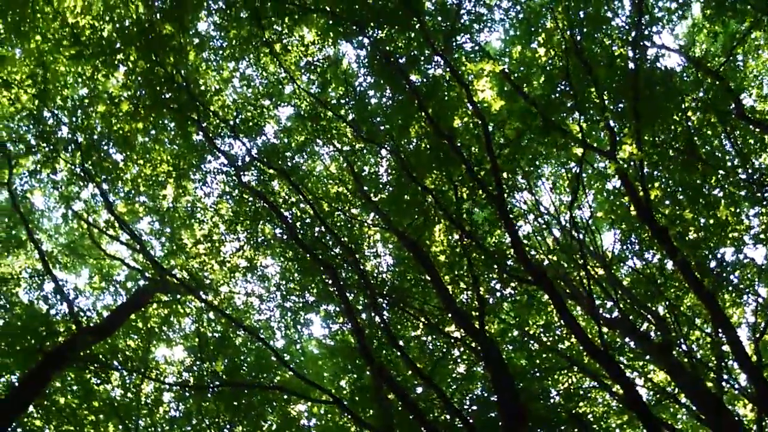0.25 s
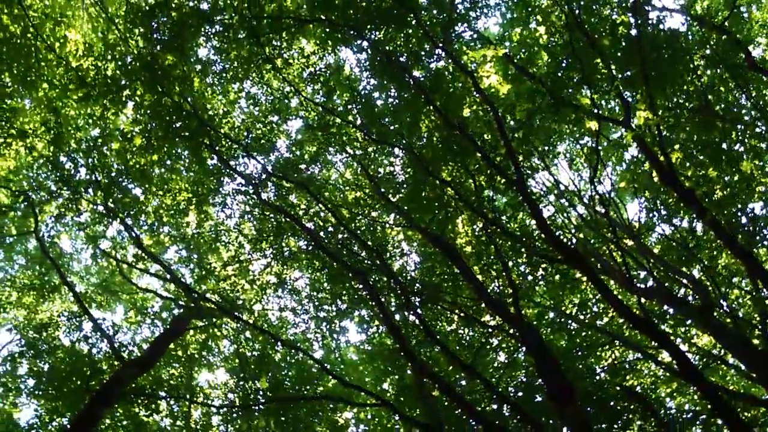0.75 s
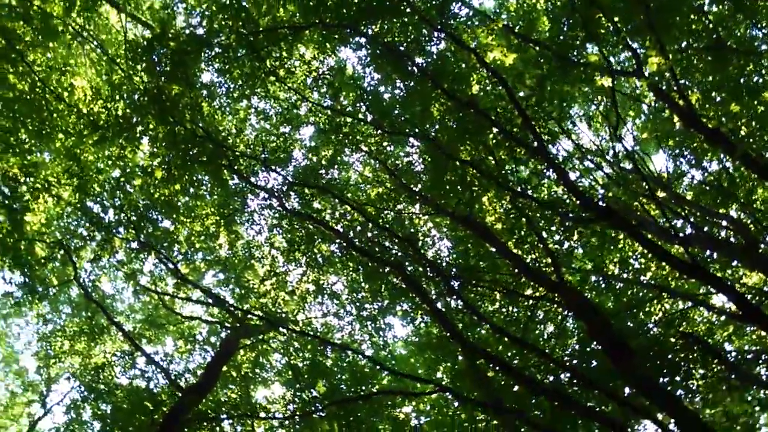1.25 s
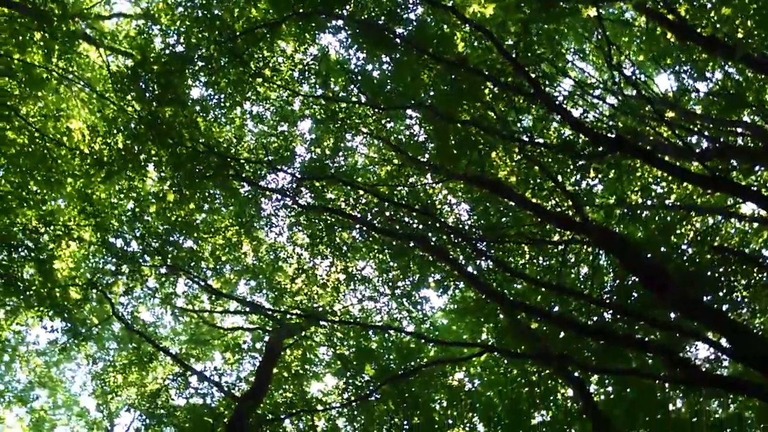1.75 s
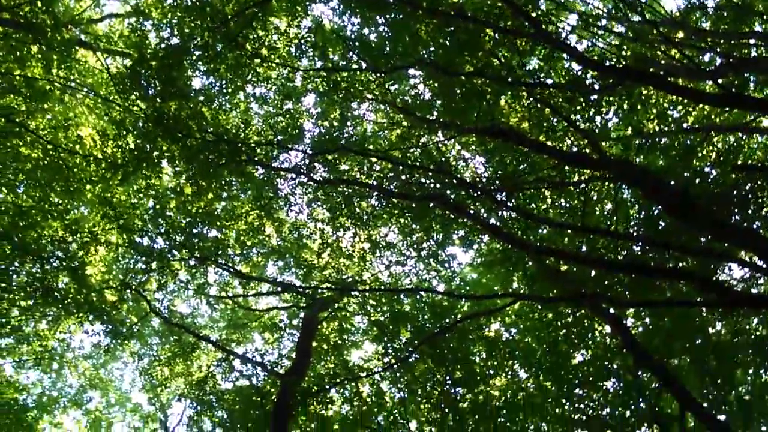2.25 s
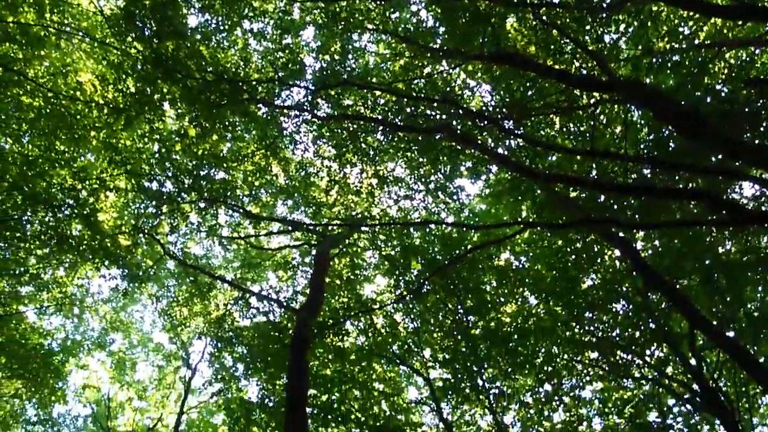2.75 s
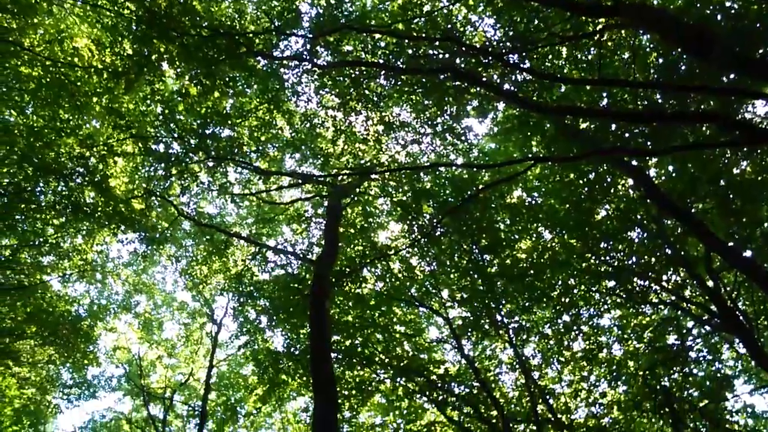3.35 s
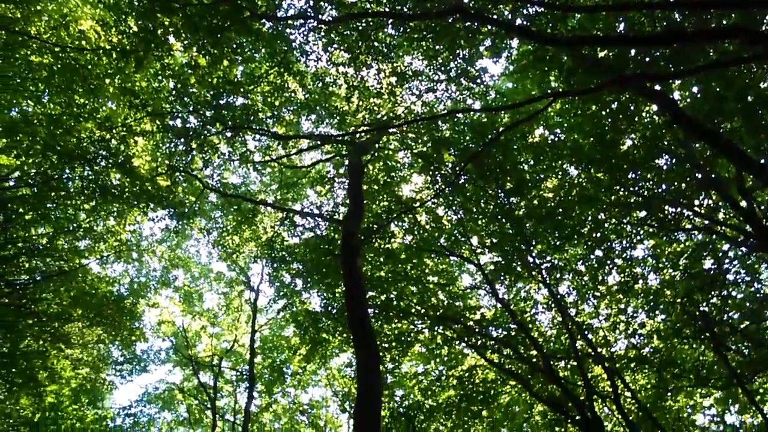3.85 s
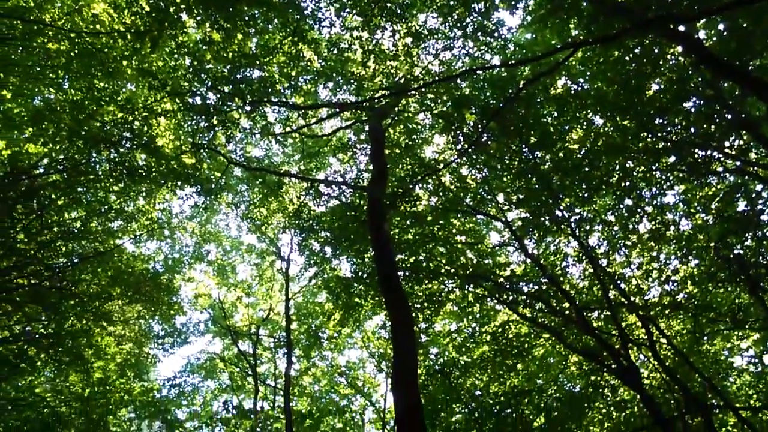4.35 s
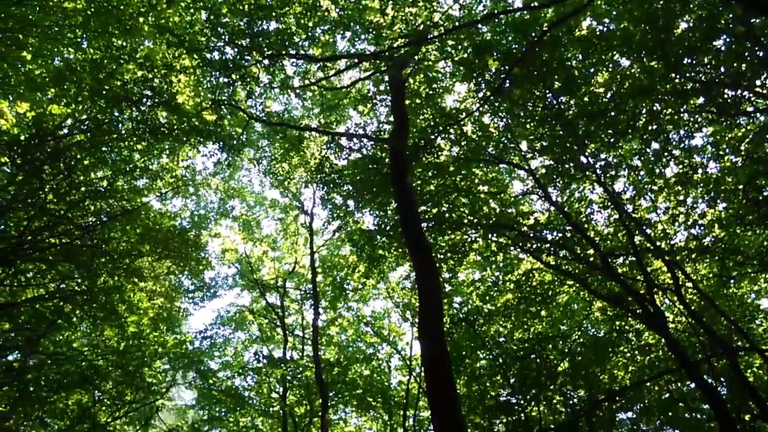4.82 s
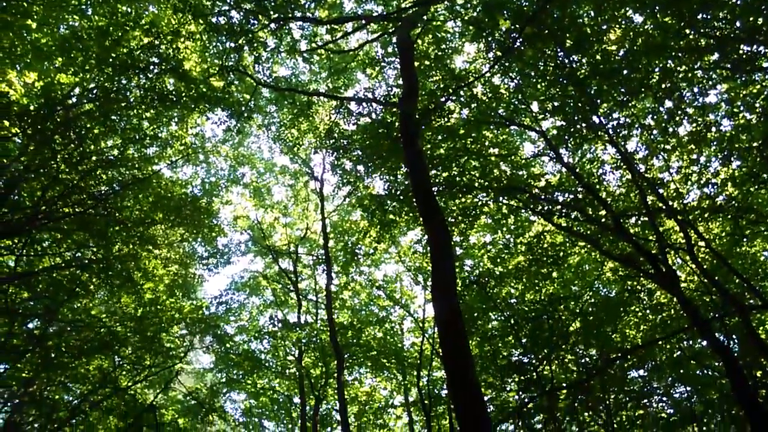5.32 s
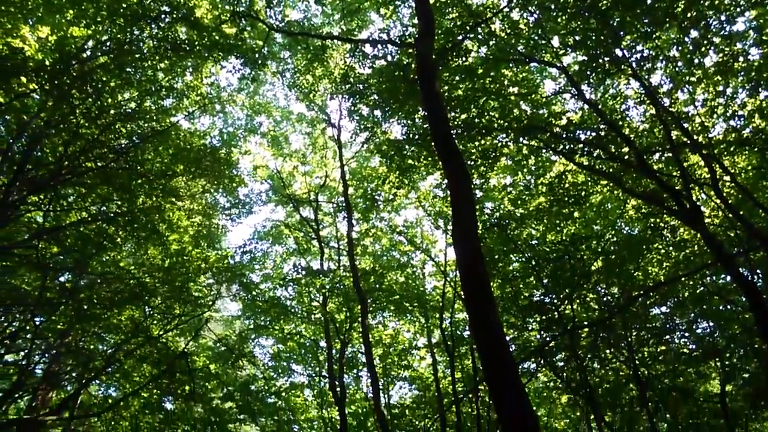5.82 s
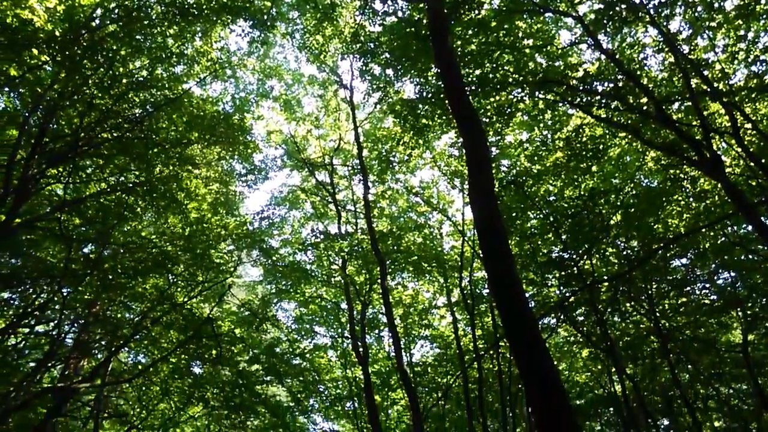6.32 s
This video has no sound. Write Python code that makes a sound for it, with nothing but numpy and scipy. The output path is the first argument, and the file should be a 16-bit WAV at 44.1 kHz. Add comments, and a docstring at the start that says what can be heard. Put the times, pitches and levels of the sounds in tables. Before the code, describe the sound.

A warbler sings sliding, clear whistles with rasps in a leafy, echoing wood, while breeze and fingers thump and rumble on the microphone.

```python
"""Warbler in a leafy wood

A warbler sings sliding whistles with rasps and a chack; thinner calls and a twitter sound farther off.
The voices are gliding sines with faint partials, the rasps bands of noise; scatter from trunks and
leaves gives them a long tail. Leaves and far air are flickering noise. A breeze buffets two microphone
ports, the left one harder, as trains of eddy pulses; fingers on the housing ring its damped modes."""
import sys
import numpy as np
from scipy import signal
from scipy.fft import rfft, irfft
from scipy.io import wavfile
from scipy.ndimage import uniform_filter1d

SR = 44100
rng = np.random.default_rng(int(sys.argv[2]) if len(sys.argv) > 2 else 0)


def wav_out(sig):
    """Save sig, one row per channel (or a flat mono array), as 16-bit PCM at SR to the path in sys.argv[1]."""
    wavfile.write(sys.argv[1], SR, np.round(np.clip(np.atleast_2d(sig).T, -1, 1) * 32767).astype(np.int16))


N = 290178


def from_db(db):
    """The decibel law: amplitude gain of a level in dB."""
    return 10 ** (np.asarray(db) / 20)


def rms_one(x):
    """Normalisation by energy: scales each channel to rms 1."""
    return x / np.sqrt(np.mean(x ** 2, axis=-1, keepdims=True) + 1e-20)


def in_time(rows):
    """Linear interpolation: each column of a curve, sample by sample."""
    s, *columns = np.transpose(rows)
    return [np.interp(np.arange(N) / SR, s, column) for column in columns]


def at_hz(points, hz):
    """Interpolation on the logarithmic frequency axis: reads a spectrum at hz."""
    point_hz, values = np.array(points).T[:2]
    return np.interp(np.log(hz), np.log(point_hz), values)


def band(x, low_hz, high_hz, order=2):
    """Band-pass filtering: keeps what lies between two frequencies."""
    edges = [low_hz, min(high_hz, SR / 2.1)]
    return signal.sosfilt(signal.butter(order, edges, "band", fs=SR, output="sos"), x)


def drift(rate_hz):
    """Low-passed noise: a slow random course with rms 1."""
    step = 40   # samples between computed points
    pole = np.exp(-2 * np.pi * rate_hz * step / SR)
    noise = rng.standard_normal(N // step + 2002)
    slow = signal.lfilter([1], [1, -2 * pole, pole ** 2], noise)[2000:]   # without the settling
    return np.interp(np.arange(N) / step, np.arange(len(slow)), rms_one(slow))


def add(out, sound, s, pan_db):
    """Superposition: adds a sound at s seconds with a level difference, left over right."""
    i = max(round(s * SR), 0)
    out[:, i:i + len(sound)] += sound[:N - i] * from_db([[pan_db / 2], [-pan_db / 2]])


def leaves(patchy_db):
    """Broadband noise of leaves and far air: half-octave bands, each flickering a little."""
    # Each row: frequency in Hz, relative spectral density in dB per Hz.
    density = [(120, -18), (200, -3), (283, -0.5), (556, -4), (801, -5), (1050, -10.5), (1690, -11.5),
               (2480, -15), (3780, -14), (4620, -16.5), (13100, -14), (14800, -20), (15800, -27.5)]
    # Each row: time in seconds, level of the whole in dB.
    course = [(0, -52), (.45, -52), (.9, -53), (1.08, -56.5), (1.2, -54), (1.85, -57), (1.97, -55),
              (2.4, -56), (2.72, -58), (2.85, -54.5), (3.2, -54.5), (4.2, -53.5), (5.3, -57), (5.95, -57),
              (6.06, -56.5), (6.29, -56.5), (6.36, -50.5), (6.58, -55.5)]
    # Each row: frequency in Hz, left-right correlation.
    likeness = [(200, 0.36), (700, 0.23), (1400, 0.0847), (15000, 0.043)]
    out = 0
    together = drift(7.5)
    edges = 110 * 2 ** np.arange(0, 7.6, .5)
    white = rng.standard_normal((2, 2, N))
    for k, (low, high) in enumerate(zip(edges, edges[1:])):
        mid, side = band(white[k % 2], low, high)   # neighbouring bands use separate noise
        hz = np.sqrt(low * high)
        alike = np.clip(at_hz(likeness, hz), -1, 1)
        flicker_db = patchy_db * (0.2 * together + drift(24))
        gain = from_db(at_hz(density, hz) + flicker_db)
        out = out + gain * (np.sqrt(1 + alike) * mid + np.sqrt(1 - alike) * side * [[1], [-1]])
    return from_db(in_time(course)[0]) * rms_one(out)


def breeze(port, lull_db, lull_edge_db):
    """Energy addition of puffs over a lull: each strikes fast, holds and dies away, its edge sooner.

    Returns the thud level in dB and the edge level in dB relative to the thud."""
    # Puffs of breeze on a port. Each row: port, start of the hold in seconds, hold in seconds,
    # thud level in dB, edge level in dB relative to the thud.
    puffs = [("left", 0.029, 0.01, -13.5, -8.5), ("left", 0.098, 0.0059, -16, -12.5),
             ("left", 0.238, 0.02, -32.5, -40), ("left", 0.31, 0.025, -38, -28),
             ("left", 0.421, 0.033, -19, -16), ("left", 0.493, 0.068, -23, -30),
             ("left", 0.606, 0.0056, -16.5, -41), ("left", 0.421, .015, -19, -32),
             ("left", .69, 0.0061, -24.5, 8.8), ("left", 0.734, 0.011, -12, -39),
             ("left", 0.796, 0.06, -24, -18), ("left", 0.937, 0.016, -20.5, -40),
             ("left", 0.98, 0.11, -25.5, -39), ("left", 0.95, 0.21, -37, -28),
             ("left", 1.5, 0.0072, -31.5, 1.5), ("left", 1.503, 0.0025, -27, -30),
             ("left", 1.65, 0.016, -39, -30), ("left", 1.83, 0.12, -41.5, -0.35),
             ("left", 2.0, 0.12, -39, -8.5), ("left", 2.21, .05, -36, -22), ("left", 2.27, 0.066, -32, -40),
             ("left", 2.43, 0.051, -28, -16), ("left", 2.56, 0.15, -34, -6),
             ("left", 2.76, 0.023, -30.5, -5.5), ("left", 2.83, 0.062, -39.5, 0.86),
             ("left", 2.98, 0.029, -39.5, 0.33), ("left", 3.12, 0.042, -33, -3.5),
             ("left", 3.24, 0.048, -31, -3), ("left", 3.435, 0.015, -32, -3.5),
             ("left", 3.71, 0.049, -35, -5.5), ("left", 3.8, 0.15, -29, -0.58),
             ("left", 4.035, 0.056, -30, -0.92), ("left", 4.2, 0.19, -32.5, -0.76),
             ("left", 4.58, 0.18, -36, -1.8), ("left", 4.82, 0.093, -36, -1.5),
             ("left", 4.97, 0.097, -33, -12.5), ("left", 6.8, 0.011, -38, -24),
             ("left", 5.14, 0.19, -38, -38), ("left", 5.41, 0.045, -34, -5),
             ("left", 5.46, 0.19, -38, -3.5), ("left", 5.625, 0.17, -41, -2.5),
             ("left", 5.94, 0.023, -36.5, -16.5), ("left", 6.16, 0.134, -42, -4),
             ("left", 6.33, 0.076, -33.5, -33), ("left", 6.48, 0.11, -39, -20),
             ("right", 0.14, 0.079, -31, -36), ("right", 0.273, .1, -37.5, -31),
             ("right", 0.44, 0.022, -23, -36), ("right", 0.536, 0.13, -29, -39),
             ("right", 0.643, 0.022, -23.5, -20), ("right", 0.76, 0.13, -35, -19),
             ("right", 0.956, 0.15, -39, -12), ("right", 1.9, 0.031, -32.5, -36),
             ("right", 2.41, 0.091, -33.5, -25), ("right", 2.7, .4, -43.5, -1.5),
             ("right", 4.5, 0.086, -41.5, -13), ("right", 5.11, 0.048, -36.5, -20),
             ("right", 5.61, 0.02, -35, -27), ("right", 6.435, 0.018, -39, -27)]
    rise_db_per_s, thud_fall_db_per_s, edge_fall_db_per_s = 900, 297, 705.5
    rows = np.array([row[1:] for row in puffs if row[0] == port])
    s, hold, db, edge_db = rows.T[:, :, None]
    t = np.arange(0, N / SR + .002, .002)
    struck_db = db - rise_db_per_s * np.maximum(s - t, 0)
    after = np.maximum(t - s - hold, 0)
    thud_puffs = from_db(struck_db - thud_fall_db_per_s * after)
    edge_puffs = from_db(struck_db + edge_db - edge_fall_db_per_s * after)
    thud = np.sum(thud_puffs ** 2, axis=0) + from_db(lull_db) ** 2
    edge = np.sum(edge_puffs ** 2, axis=0) + from_db(lull_db + lull_edge_db) ** 2
    return in_time(np.transpose([t, 10 * np.log10(thud), 10 * np.log10(edge / thud)]))


def buffeting(thud_db, edge_db, rumble_db=-6):
    """Near-periodic eddy shedding: each eddy a low thud with a sharper edge, over formless rumble."""
    eddies_per_s, jitter, spread_db = 62, .2, 2.5   # jitter: spread of the log interval
    draws = rng.standard_normal((600, 2))
    at = (np.cumsum(np.exp(jitter * draws[:, 0])) / eddies_per_s * SR).astype(int)
    pulses = np.full(N, 1e-18)
    pulses[at[at < N]] = from_db(spread_db * draws[at < N, 1])
    thud = rms_one(band(pulses, 31.7, 106.5, order=3))
    rumble = rms_one(band(rng.standard_normal(N), 35, 60.5))
    softened = signal.lfilter([1], [1, -.97], pulses)
    edge = rms_one(signal.lfilter([1], [1, -.95], band(softened, 83.3, 214.5)))
    return from_db(thud_db) * (thud + from_db(rumble_db) * rumble + from_db(edge_db) * edge)


def knocks():
    """Modal excitation: each touch strikes all housing modes unequally; the grip damps the ring."""
    # Fingers on the housing. Each row: start in seconds, strike level in dB, left-right difference
    # in dB, share of the free ring time.
    touches = [(0.381, -37.5, 9, 1), (0.413, -36.5, 9, 0.99), (0.462, -30.5, 20, 0.19),
               (0.467, -26, 5, 0.84), (0.488, -31, 9, 0.3), (0.74, -39.5, 1.0, 1), (1.173, -42.5, 15, 0.34),
               (1.593, -44, 11, 1), (3.354, -34.5, 12.5, 0.13), (3.657, -20.5, 5.5, 0.94),
               (3.678, -36, 9, 0.9), (3.698, -28.5, -5, 0.25)]
    # Modes of the housing. Each row: frequency in Hz, relative level in dB, free 60 dB decay in seconds.
    modes = [(302, -8.5, 0.009), (589, 0.5, 0.016), (850, -6.5, 0.024), (1222, -11.5, 0.046),
             (1435, -39, 0.039)]
    out = np.zeros((2, N))
    t = np.arange(SR // 8) / SR
    strength_db = 1.5 * rng.standard_normal((len(touches), len(modes)))
    contact = 1 - np.exp(-t / .00025)   # a fingertip is soft
    for (s, db, pan_db, freedom), own_db in zip(touches, strength_db):
        ring = 0
        for (hz, level_db, t60), extra_db in zip(modes, own_db):
            decay = from_db(level_db + extra_db - 60 * t / (freedom * t60))
            ring = ring + decay * np.sin(2 * np.pi * hz * t)
        add(out, from_db(db) * contact * ring, s, pan_db)
    return out


def whistle(rows, burr, second_db=-60, third_db=-60, fade_s=0.00347, slur_s=0.00072):
    """Frequency modulation: a gliding sine and two partials; pitch slurs and trembles by share burr."""
    # What the open beak does to overtones. Each row: frequency in Hz, gain in dB.
    beak = [(4400, 13.5), (6500, -1), (8000, -3), (10500, 6), (12000, 15), (14000, 12.5), (16000, -4)]
    s, hz, db = np.transpose(rows)
    t = s[0] + np.arange(round((s[-1] - s[0] + fade_s) * SR)) / SR
    noise = rng.standard_normal(SR // 2)
    tremble = rms_one(signal.lfilter([1], [1, -1.9, .9025], noise))[-len(t):]
    slurred = uniform_filter1d(np.interp(t, s, hz), max(round(slur_s * SR), 1))
    pitch = slurred * (1 + burr * tremble)
    phase = 2 * np.pi * np.cumsum(pitch) / SR
    tone = np.sin(phase)
    for k, partial_db in ((2, second_db), (3, third_db)):
        tone = tone + from_db(partial_db + at_hz(beak, k * pitch)) * np.sin(k * phase)
    to_end = np.minimum(t - t[0], t[-1] - t)
    fade = np.sin(np.pi / 2 * np.clip(to_end / fade_s, 0, 1)) ** 2
    return np.sqrt(2) * from_db(np.interp(t, s, db)) * fade * tone


def creak():
    """Frequency-modulated roughness: a faint trembling tone that creeps upward after a knock."""
    # Each row: time in seconds, pitch in Hz, level in dB.
    path = [(3.699, 1250, -48), (3.779, 1260, -72), (3.904, 1366, -58.5), (3.971, 1495, -74),
            (4.028, 1444, -60), (4.15, 1590, -81)]
    out = np.zeros((2, N))
    add(out, whistle(path, burr=0.081), path[0][0], pan_db=15.5)
    return out


def wood(x, direct_db, scatter_db, spread):
    """Multiple scattering: direct sound plus a dense tail that swells, then decays band by band."""
    # Each row: frequency in Hz, 60 dB decay in seconds.
    decay_s = [(1500, 0.56), (3000, 0.67), (6000, 0.67), (12000, 0.8)]
    rise_s, alike, port_lag_s = 0.0052, 0.031, 0.00012   # alike: left-right correlation of the scatter
    trunks_db, trunks_t60_s = -2, 0.21
    t = np.arange(round(1.3 * SR)) / SR
    shared, own = rng.standard_normal((2, len(t)))
    noise = np.sqrt(1 + alike) * shared + np.sqrt(1 - alike) * own * [[1], [-1]]
    edges = 900 * 2 ** np.arange(0, 4.6, .5)
    tail = 0
    for low, high in zip(edges, edges[1:]):
        t60 = at_hz(decay_s, np.sqrt(low * high))
        tail = tail + band(noise, low, high) * from_db(-60 * t / t60)
    near_trunks = from_db(trunks_db - 60 * t / trunks_t60_s)   # the closest trunks return more, and early
    tail = tail * (1 + near_trunks) * (1 - np.exp(-t / rise_s))
    tail = tail / np.sqrt(np.sum(tail ** 2, axis=1, keepdims=True))
    share = np.clip(spread, 0, 1)
    mixed = np.sqrt((1 - share) + share / 2) * x + np.sqrt(share / 2) * x[::-1]   # from both sides
    scatter = signal.fftconvolve(mixed, tail, axes=1)[:, :N]
    left, right = from_db(direct_db) * x + from_db(scatter_db) * scatter
    # a linear phase delays the right port
    lag = np.exp(-2j * np.pi * np.fft.rfftfreq(N, 1 / SR) * port_lag_s)
    return np.array([left, irfft(rfft(right) * lag, N)])


def airy(song, air_db):
    """Turbulence noise: air rushing through the syrinx hisses in step with the song's loudness."""
    loudness = uniform_filter1d(np.abs(song), SR // 300, axis=1)
    hiss = rms_one(band(rng.standard_normal(N), 7500, 14500))
    return song + from_db(air_db) * loudness * hiss


def shaped(glide, db, swell, fade):
    """Amplitude envelope of a glide: swell, hold, fade, and weaker where the pitch dips low."""
    swell_db, fade_db = 18.5, 17   # depth below the note's level at its start and end
    weak_below_hz, weak_db_per_octave = 3650, 5.5
    s, hz = np.transpose(glide)
    swell = np.clip(swell, 1e-3, .99)
    turns = s[0] + (s[-1] - s[0]) * np.array([0, swell, max(1 - abs(fade), swell), 1])
    at = np.unique(np.append(s, turns))
    pitch = np.interp(at, s, hz)
    octaves_under = np.maximum(np.log2(min(weak_below_hz, hz.max()) / pitch), 0)
    envelope_db = np.interp(at, turns, [swell_db, 0, 0, fade_db])
    return np.transpose([at, pitch, db - weak_db_per_octave * octaves_under - envelope_db])


def high_calls():
    """Single frequency sweeps: thin whistles, some nearly pure, some burred."""
    # Each row: start in seconds, length in seconds, first pitch in Hz, last pitch in Hz, level in dB
    # before the wood, swell share, fade share, left-right difference in dB, pitch tremble share.
    calls = [(0, 0.0085, 7070, 6140, -30, .02, .05, -3, 0.075),
             (0.203, 0.053, 8180, 8350, -57, .02, .05, -40, 0.016),
             (0.262, 0.06, 9240, 9150, -48.5, .02, 0.36, -29, 0.027),
             (0.266, 0.039, 7270, 7720, -40.5, .02, .5, -19, 0.028),
             (0.359, 0.044, 6840, 7760, -36, .02, 0.18, -7, 0.032),
             (0.363, 0.062, 8820, 9120, -45.5, .02, 0.35, -19, 0.025),
             (0.426, 0.016, 8150, 7540, -51, .02, .9, -10, .025),
             (1.161, 0.03, 6900, 6820, -51, .02, .02, -15, 0.029),
             (1.891, 0.061, 9160, 9610, -44, 0.52, .02, -25.5, 0.013),
             (1.896, 0.038, 9450, 8840, -56, .02, .02, -20, .021),
             (1.968, 0.0077, 10100, 6700, -24.5, .02, 0.98, -19, 0.007),
             (1.975, 0.017, 6650, 7570, -34, .1, .02, -7, 0.0046),
             (2.76, 0.014, 6650, 7250, -36, .6, .02, -17, 0.026),
             (2.776, 0.042, 9310, 3760, -24.5, 0.33, 0.27, -5, 0.013),
             (3.099, 0.043, 6530, 7340, -49.5, .02, 0.12, -27.5, 0.054),
             (3.197, 0.045, 8300, 8380, -55, .02, .1, -19, .004),
             (3.207, 0.094, 6720, 7040, -39.5, .02, .05, -8, 0.048),
             (4.974, 0.035, 8160, 7250, -47, .3, .02, -27, 0.035),
             (5.041, 0.041, 11230, 11580, -49.5, .02, 0.29, -27, 0.02),
             (5.045, .025, 8600, 7860, -61, .02, .9, -8, 0.02),
             (5.401, 0.048, 7360, 7600, -43.5, .1, .02, -25, 0.087),
             (5.514, 0.043, 7390, 7420, -40, .02, .8, -29, 0.057),
             (5.617, 0.021, 7250, 6780, -30.5, .02, 0.73, 1, 0.028),
             (6.001, 0.044, 6680, 6210, -43.5, .02, 0.91, -6, 0.022),
             (6.457, 0.071, 8080, 7540, -52, .02, 0.11, -20.5, 0.039)]
    out = np.zeros((2, N))
    for s, length, from_hz, to_hz, db, swell, fade, pan_db, burr in calls:
        glide = [(s, from_hz), (s + length, to_hz)]
        add(out, whistle(shaped(glide, db, swell, fade), burr), s, pan_db)
    return out


def twitter():
    """Two coupled sources: quick falling syllables sung with both halves of the syrinx."""
    # Each row: start in seconds, level of the upper voice in dB before the wood.
    syllables = [(4.769, -34.5), (4.827, -31.5), (4.876, -29.5)]
    length_s, drop = 0.025, 0.834   # drop: last pitch over first
    upper_hz, lower_hz, lower_db = 8570, 7250, 2.5   # lower_db: relative to the upper voice
    out = np.zeros((2, N))
    for s, db in syllables:
        for hz, voice_db in (upper_hz, db), (lower_hz, db + lower_db):
            glide = [(s, hz), (s + length_s, hz * drop)]
            sound = whistle(shaped(glide, voice_db, swell=.05, fade=0.79), burr=.004)
            add(out, sound, s, pan_db=1.5)
    return out


def rasps():
    """Filtered noise: chaotic flutter in the throat resonance with a hissy top."""
    # Harsh scolding notes. Each row: start in seconds, length in seconds, centre in Hz, width in Hz,
    # level in dB before the wood, treble in dB relative to it, left-right difference in dB.
    notes = [(0.438, 0.015, 5670, 1300, -31, -21, -3), (2.203, 0.047, 5280, 1430, -27, -18.5, 9.5),
             (2.237, 0.0082, 5940, 4900, -30, -20, -13), (2.755, 0.015, 6700, 1490, -45.5, -9, -8),
             (2.791, 0.03, 6600, 2980, -39.5, -5.5, -22.5), (3.5, 0.035, 5520, 1185, -32.5, -9, -1.5),
             (4.389, 0.024, 5120, 695, -18, -19.5, -2), (5.053, 0.015, 4950, 1470, -33.5, -4, -12)]
    out = np.zeros((2, N))
    flutter = rng.standard_normal((len(notes), SR // 5))
    for noise, (s, length, hz, width, db, treble_db, pan_db) in zip(flutter, notes):
        throat = rms_one(band(noise, hz - width / 2, hz + width / 2))
        top = rms_one(band(noise, 6900, 14500, order=1))
        rasp = throat + from_db(treble_db) * top
        size = round(length * SR)
        envelope = np.sin(np.pi * np.linspace(0, 1, size) ** 1.5) ** 2
        add(out, from_db(db) * rasp[-size:] * envelope, s, pan_db)
    return out


def chack():
    """Harmonic richness: a dry short note with strong overtones."""
    # Each row: time in seconds, pitch in Hz, level in dB before the wood.
    path = [(6.32, 1050, -67), (6.327, 1602, -46), (6.333, 2374, -45), (6.343, 2336, -41),
            (6.349, 1766, -41), (6.357, 1283, -50.5)]
    out = np.zeros((2, N))
    add(out, whistle(path, burr=0.0081, second_db=-2.0, third_db=-10), path[0][0], pan_db=6.0)
    return out


def warbler():
    """Nonlinear voicing: sliding whistles whose partials grow with effort, beside rasps and a chack."""
    # A note a row. Each row: level in dB before the wood, swell share, fade share, left-right
    # difference in dB, pitch tremble share, glide as pairs of time in seconds and pitch in Hz.
    notes = [(-27.5, 0.0085, 0.98, -35.5, 0.019, [(0.0, 3994), (0.03, 3845)]),
             (-25, 0.55, 0.0071, 10, 0.053, [(0.0, 5600), (0.03, 4246)]),
             (-22, .02, 0.44, -10.5, 0.029, [(0.065, 4260), (0.09, 4710), (0.135, 4990)]),
             (-38, 0.3, 0.3, 0, 0.074, [(0.178, 3290), (0.205, 3680)]),
             (-28.5, 0.1, 0.3, -8, 0.032, [(0.214, 4940), (0.228, 4340), (0.234, 3500)]),
             (-25, 0.093, 0.21, -9.5, 0.031, [(0.297, 4040), (0.308, 4050), (0.314, 3360), (0.34, 3554),
             (0.365, 4040)]), (-31, 0.08, 0.6, -13.5, 0.048, [(0.445, 4230), (0.458, 4670), (0.495, 4460)]),
             (-23, 0.071, 0.22, -7.5, 0.0212, [(0.531, 4320), (0.552, 4050), (0.562, 3315), (0.59, 3630),
             (0.63, 4130)]), (-25.5, 0.029, 1, -10, 0.0018, [(0.713, 5110), (0.727, 4000)]),
             (-24.5, .02, 1, -1, 0.046, [(0.734, 6400), (0.741, 4760), (0.755, 5600)]),
             (-39, .1, 0.29, 13, 0.034, [(0.793, 6200), (0.802, 6000)]),
             (-26.5, .2, 0.12, -12.5, 0.0034, [(0.8, 5560), (0.808, 4270)]),
             (-24, 0.15, 0.2, -5.5, 0.015, [(0.876, 3493), (0.908, 3324), (0.914, 2520)]),
             (-26, 0.049, 0.82, -21, 0.01, [(0.925, 3410), (0.937, 3726), (0.99, 3850)]),
             (-46, 0.19, 0.014, 2, 0.016, [(1.7, 1950), (1.715, 2550)]),
             (-34, 0.072, 0.85, 10, 0.035, [(1.72, 3510), (1.735, 2747), (1.76, 3187), (1.8, 2920)]),
             (-55.5, 0.092, .1, 8, .01, [(2.095, 1920), (2.118, 2480)]),
             (-22.5, 0.148, 1, -2, 0.024, [(2.122, 3000), (2.14, 2733)]),
             (-30, 0.46, .55, 8, 0.03, [(2.16, 3040), (2.17, 3153), (2.187, 3146)]),
             (-45, 0.17, 0.13, 20, 0.0023, [(2.405, 2030), (2.44, 2219), (2.52, 2067), (2.62, 2007)]),
             (-32.5, 0.35, 0.67, 19.5, .002, [(2.638, 2430), (2.662, 2287), (2.68, 1514)]),
             (-27.5, 0.64, 0.12, -23.5, .002, [(2.94, 4405), (2.95, 4586), (2.957, 2775), (2.972, 2220)]),
             (-29, 0.53, 0.09, 19.5, .002, [(3.0, 3270), (3.02, 2980), (3.06, 2788)]),
             (-19, 0.16, 0.85, -0.5, .002, [(3.285, 2427), (3.3, 2940), (3.35, 3210)]),
             (-17, .05, 0.39, -10, 0.00068, [(3.355, 3087), (3.38, 3382), (3.44, 3477), (3.49, 3200)]),
             (-20, .05, 0.54, -16, 0.012, [(3.527, 4360), (3.536, 3480), (3.552, 2480)]),
             (-25, .1, 0.18, -10, 0.015, [(3.54, 4080), (3.548, 3470), (3.558, 3120)]),
             (-20.5, .15, 0.22, -9, 0.015, [(3.566, 3170), (3.591, 2566)]),
             (-26.5, .3, 0.37, 10.5, 0.01, [(3.612, 3440), (3.618, 2580), (3.626, 2080)]),
             (-17.5, 0.13, 0.042, -0.5, 0.0012, [(3.711, 5960), (3.72, 6505), (3.735, 5290), (3.75, 4950),
             (3.772, 5072), (3.785, 5510)]), (-18.5, 0.041, 0.45, -3.5, 0.00097, [(3.853, 2470),
             (3.885, 2880), (3.92, 3018), (3.98, 3025), (4.01, 2875), (4.03, 2740)]),
             (-21, 0.014, 0.048, -4.5, 0.00089, [(4.025, 2515), (4.075, 2658), (4.09, 2350)]),
             (-22.5, 0.073, 0.038, -27.5, 0.0018, [(4.158, 3970), (4.17, 3573), (4.21, 3455),
             (4.28, 3498)]), (-16.5, 0.17, 0.1, -3.5, 0.0071, [(4.41, 3380), (4.43, 3173), (4.46, 3110)]),
             (-17, 0.1, 0.078, -16.5, 0.0018, [(4.462, 3360), (4.472, 3530), (4.487, 3620), (4.503, 3380)]),
             (-21, 0.1, 0.2, -12, 0.0047, [(4.506, 3280), (4.525, 2907), (4.552, 3196)]),
             (-27, 0.36, 0.295, -11, .004, [(4.56, 3020), (4.578, 2950)]),
             (-18.5, .02, 0.19, 11, 0.0083, [(4.581, 4860), (4.596, 4330), (4.608, 4295)]),
             (-17.5, 0.15, 0.59, -18.5, 0.0044, [(4.668, 3473), (4.697, 3520), (4.713, 3880), (4.73, 4000),
             (4.755, 3870)]), (-15.5, 0.086, 0.55, 4, 0.00072, [(4.8, 3156), (4.835, 3109), (4.85, 3216),
             (4.9, 3127)]), (-16.5, 0.035, 0.041, -12.5, 0.0015, [(4.878, 3750), (4.9, 3514),
             (4.97, 3604)]), (-20, 0.53, 0.73, -11, 0.0022, [(5.045, 7560), (5.07, 6720), (5.11, 6320)]),
             (-32, .02, .05, 1, 0.0134, [(5.06, 4080), (5.08, 5440)]),
             (-13, 0.31, 0.28, -1.5, 0.019, [(5.165, 6030), (5.19, 5244), (5.225, 4160), (5.26, 3970)]),
             (-14, 0.51, 0.31, -6.5, 0.0025, [(5.358, 3550), (5.378, 3698), (5.395, 3770)]),
             (-16.5, 0.1, 0.3, -2.5, 0.01, [(5.393, 3480), (5.402, 2900)]),
             (-19, 0.09, 0.18, -12, 0.0043, [(5.41, 2972), (5.42, 3050), (5.438, 3550), (5.459, 4032),
             (5.464, 3090), (5.469, 2300)])]
    # partial levels at the quiet level, and their growth in dB per dB of note level
    second_db, third_db, quiet_db, partials_follow = -41, -48.5, -28, 0.18
    out = np.zeros((2, N))
    for db, swell, fade, pan_db, burr, glide in notes:
        effort_db = partials_follow * (db - quiet_db)
        rows = shaped(glide, db, swell, fade)
        sound = whistle(rows, burr, second_db + effort_db, third_db + effort_db)
        add(out, sound, glide[0][0], pan_db)
    return out + chack() + rasps()


def scene():
    """Superposition of fields: birds heard through the wood, wind and fingers right at the ports."""
    left_wind = buffeting(*breeze("left", lull_db=-46, lull_edge_db=-15.5))
    right_wind = buffeting(*breeze("right", lull_db=-50, lull_edge_db=-23.5))
    wind = np.array([left_wind, right_wind])
    far = wood(airy(high_calls(), air_db=-10), direct_db=-12.0, scatter_db=-4.5, spread=0.037)
    overhead = wood(twitter(), direct_db=-12.5, scatter_db=-9, spread=0.3)
    near = wood(airy(warbler(), air_db=-41), direct_db=-3.5, scatter_db=-2.0, spread=1.0)
    return leaves(patchy_db=1.52) + wind + knocks() + creak() + far + overhead + near


def record(dry):
    """Band limitation: the capsules drop the deepest bass, and the top is cut steeply."""
    thin = signal.sosfilt(signal.butter(4, 36, "high", fs=SR, output="sos"), dry)
    cutoff_hz = 16050   # 70 dB down from here upward
    return signal.sosfilt(signal.cheby2(18, 70, cutoff_hz, fs=SR, output="sos"), thin)


dry = scene()
out = record(dry)
wav_out(out)
```